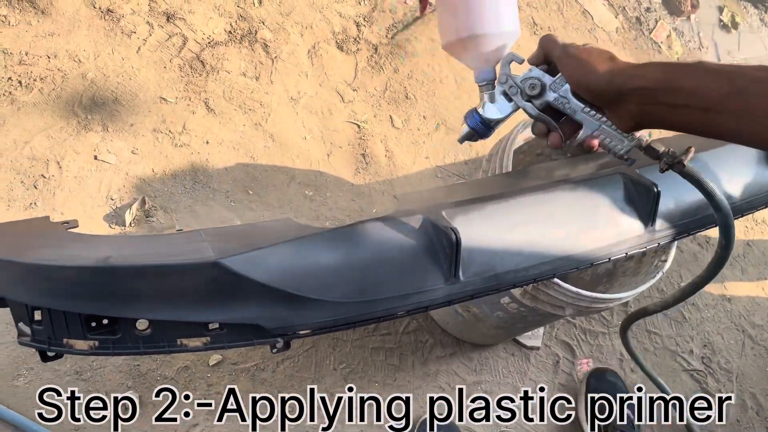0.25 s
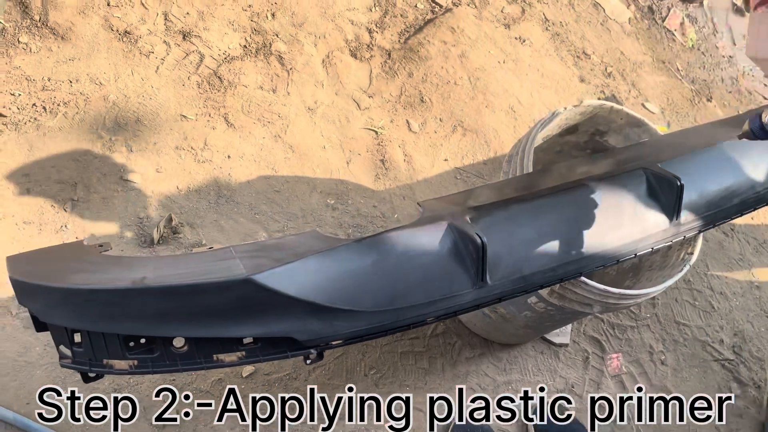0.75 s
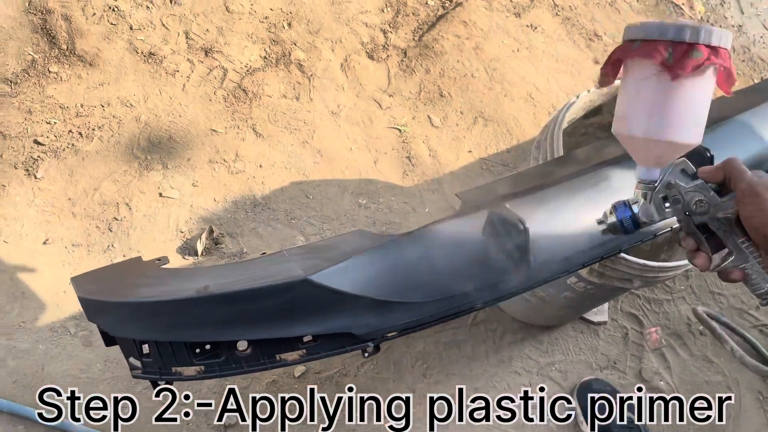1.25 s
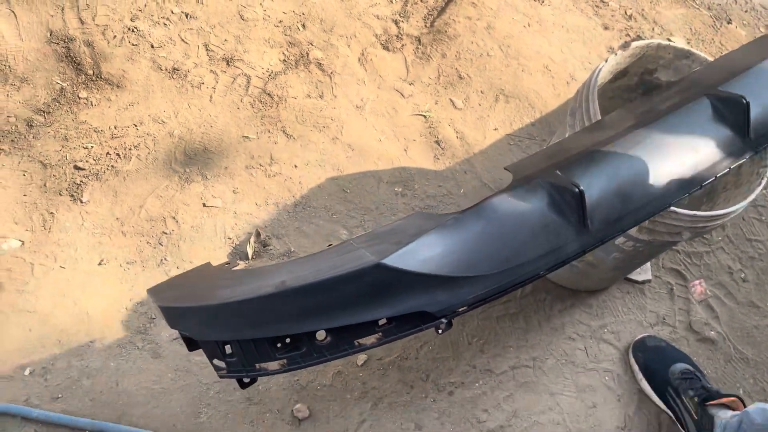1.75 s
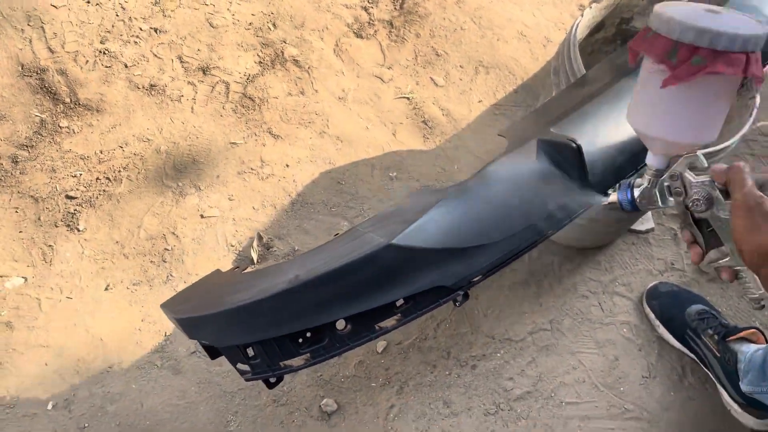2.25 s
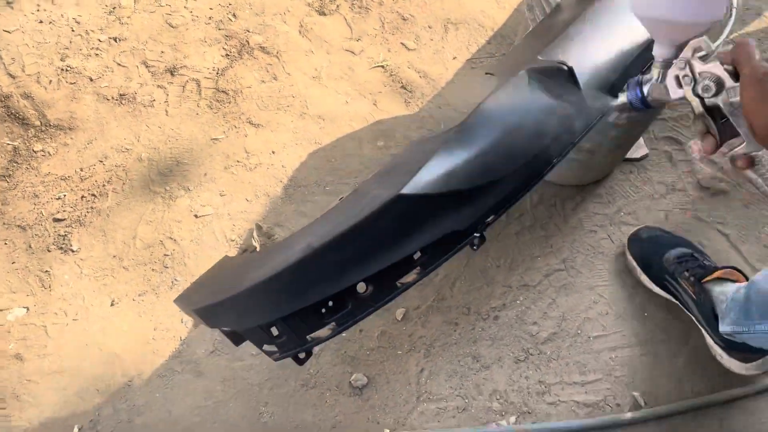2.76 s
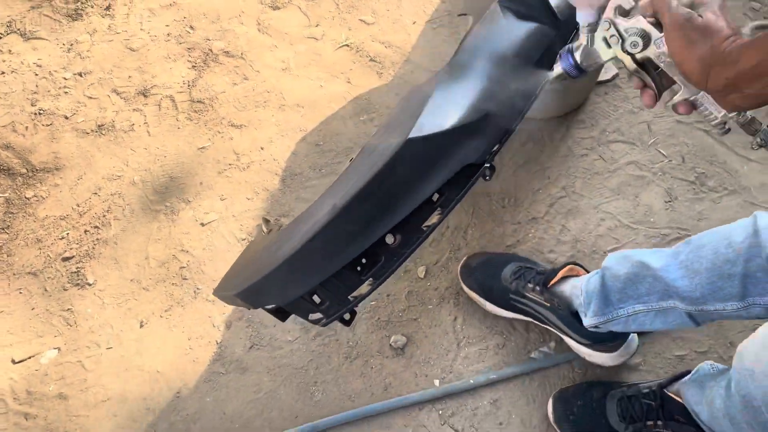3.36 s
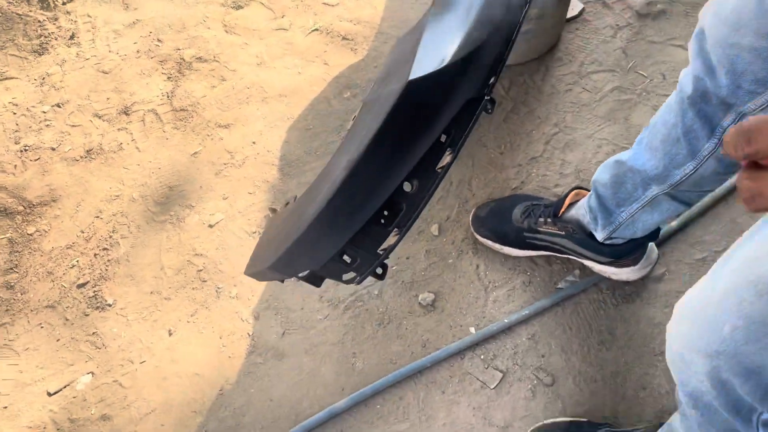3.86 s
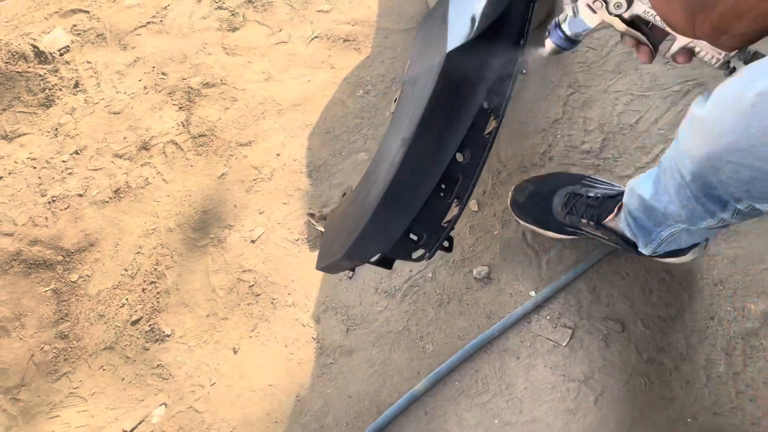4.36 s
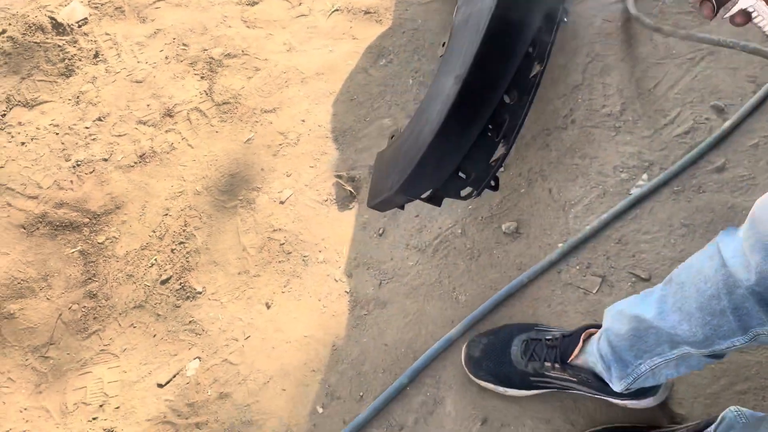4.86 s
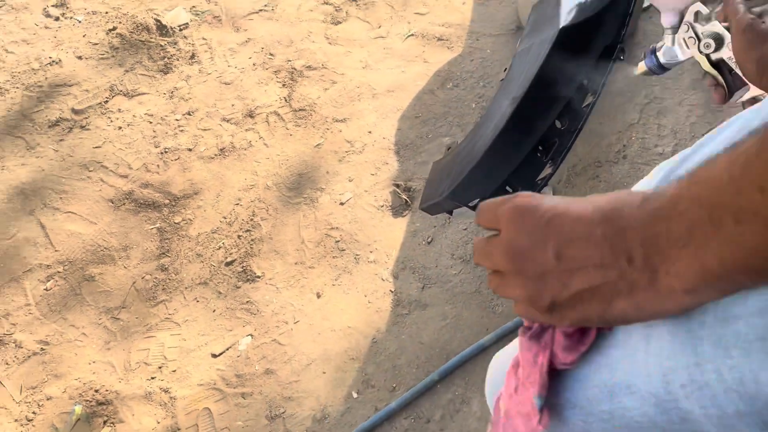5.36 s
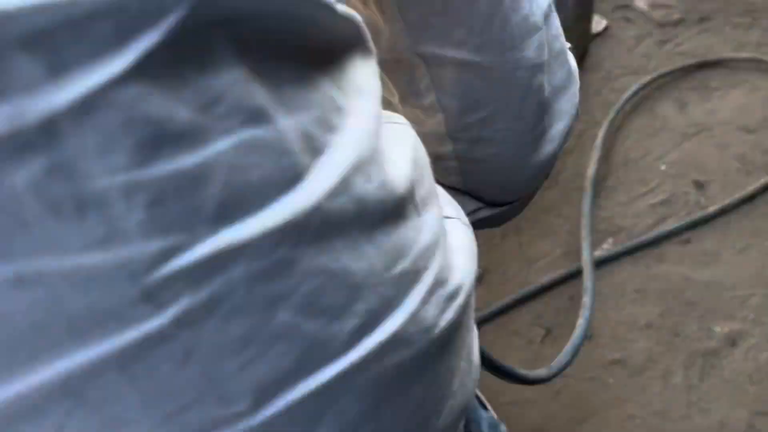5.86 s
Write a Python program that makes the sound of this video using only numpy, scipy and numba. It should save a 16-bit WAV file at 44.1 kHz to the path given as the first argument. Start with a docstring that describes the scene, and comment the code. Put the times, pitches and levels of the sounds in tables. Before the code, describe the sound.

A spray gun close to a handheld stereo microphone in an open sandy yard hisses from the start, a dense bright rush of air leaning a little left, fluttering quickly and changing colour as the gun sweeps. Underneath are low street rumble, a distant idling engine and faint hollow drumming, mostly in the first two seconds. Soft thumps fall at 0.5 and 1.5 s; a faint far sheet-metal clang rattles around 1.45 s. The engine hum swells slightly near 1.9 s. A short knock sounds at 4.06 s, then the engine revs, its pitch climbing until about 5 s before sinking from 5.2 s. A low boom comes at 4.66 s. The hiss weakens after 5.3 s, with a very thin high whistle. At 5.67 s the trigger clicks off; a dull, weak leak fades among tiny clicks until spraying returns about 5.95 s and continues to 6.1 s.

```python
"""Spray gun in a sandy yard

A spray gun sweeps to and fro over a plastic part, near a phone with two microphone ports.
Its air jet is noise in bands that swell and flutter, heard straight and scattered by the yard.
Further off a vehicle engine, a stack of sine waves, idles, is revved once and sinks back.
Noise makes the street rumble, a hollow drumming and a far clang; sines make short thumps and a thin whistle.
The trigger is let go briefly near the end, and a weak leak goes on hissing."""
import sys
import numpy as np
from scipy import signal
from scipy.fft import rfft, irfft, next_fast_len
from scipy.io import wavfile
from scipy.ndimage import uniform_filter1d
from numba import njit

SR = 44100
rng = np.random.default_rng(int(sys.argv[2]) if len(sys.argv) > 2 else 0)


def unload_audio(sound):
    """Save the sound as a 16-bit wav file, at the path given as the first command line argument."""
    columns = np.transpose(np.atleast_2d(sound))
    # keep every value between -1 and 1, then stretch to whole-number steps
    steps = np.round(np.clip(columns, -1, 1) * 32767)
    wavfile.write(sys.argv[1], SR, steps.astype(np.int16))


N = 269451
T = np.arange(N) / SR  # time of every sample in seconds
M = next_fast_len(N)  # length that makes the Fourier transform fast
HZ = np.maximum(np.arange(M // 2 + 1) * SR / M, 1)  # frequency of every spectrum bin


def undb(db):
    """Turn decibels into gain."""
    return 10 ** (np.asarray(db) / 20)


def unit(x):
    """Scale a sound to rms 1."""
    return x / np.sqrt(np.mean(x ** 2))


def curves(table):
    """Read a table's columns at every sample, with straight lines between rows."""
    seconds, *columns = np.transpose(table)
    return [np.interp(T, seconds, column) for column in columns]


def across(table):
    """Read a table's columns at every frequency, with straight lines on a log scale."""
    hz, *columns = np.transpose(table)
    return [np.interp(np.log(HZ), np.log(hz), column) for column in columns]


def noise():
    """Make the spectrum of fresh white noise."""
    return rfft(rng.standard_normal(M))


def walk(rate):
    """Wander at random: levels held for 1 / rate seconds, smoothed twice; spread near 1."""
    hold = int(SR / rate)
    steps = np.repeat(rng.standard_normal(N // hold + 1), hold)
    smooth = uniform_filter1d(uniform_filter1d(steps, hold), hold)
    return 1.4 * smooth[:N]


def resonate(x, hz, width):
    """Ring at one resonance, with gain 1 at its centre."""
    return signal.lfilter(*signal.iirpeak(hz, hz / width, SR), x)


def bump(s, half):
    """Rise and fall smoothly around a moment, reaching 1 at the top."""
    return np.exp(-((T - s) / half) ** 2)


# The jet as the gun sweeps. Each row: time in seconds, level in dB, low roar on the part in dB,
# nozzle peak in dB, treble in dB, left minus right in dB.
# Of the roar, peak and treble only the departure from their median is used.
JET_SWEEP = [(0.0, -27, -11, -8, -10, 1), (0.06, -29.5, -10, -4.5, -7.5, 2),
             (0.2, -27, -12.5, -2.5, -7, 3.4), (0.44, -28.5, -11, -10, -8.5, 5.5),
             (0.6, -30.5, -9.5, -6, -7.5, 4.5), (0.72, -29.5, -14.5, -7.5, -9, 3.4),
             (0.91, -26.5, -15.5, -8.5, -6, 4.5), (0.98, -30, -9, -8, -8.5, 7.6),
             (1.12, -28.5, -8, -7, -8.5, 5), (1.25, -25.5, -14, -11, -12, 6.6),
             (1.45, -29, -11.5, -8.5, -9.5, 4.44), (1.61, -28, -14.5, -6.5, -10.5, 3),
             (1.7, -32, -11.5, -5, -7, 2.2), (1.86, -32, -11, -4.5, -8, 1.9),
             (1.96, -28.5, -13.5, -6.5, -10, 3.1), (2.25, -27.5, -11, -9, -9, 7.5),
             (2.38, -27, -12, -9, -10.5, 4.7), (2.52, -26.5, -13, -7, -9.5, 3),
             (2.68, -27, -11, -8, -8.5, 5.1), (2.85, -29, -10.5, -8, -7, 7),
             (3.06, -31.5, -11, -6.5, -7.5, 4), (3.2, -29.5, -12.5, -9, -8, 8.3),
             (3.42, -27.5, -10, -6.5, -9, 1.48), (3.61, -25, -15.5, -8, -9, 1.11),
             (3.77, -28, -10.5, -8, -7.5, 1.11), (4.03, -29, -17.5, -12.5, -6, 5.65),
             (4.13, -32, -12, -8.5, -5.5, 5.15), (4.52, -27.5, -12, -3.5, -7.5, 1.44),
             (4.89, -29.5, -11, -10.5, -6.5, 4.7), (5.06, -31, -14, -9.5, -8, 3.96),
             (5.26, -32.5, -10.5, -4.5, -6.5, 3.35), (5.38, -33, -13, -12.5, -7, 2.87),
             (5.45, -36.5, -6.5, -4.5, -8, 2.86), (5.53, -37.5, -9, -8.5, -11, 3),
             (5.58, -37, -10, -6, -15, 4), (5.62, -38, -9, -7, -12, 3), (5.67, -39.5, -10, -9, -10, 1),
             (5.93, -40, -9, -8, -10, 1), (6.0, -34, -15, -5.5, -10, 1.5), (6.038, -32, -21, -8, -12, 1.09),
             (6.11, -33.5, -18, -5, -9, 0.97)]
# Colour of the jet. Each row: frequency in Hz, relative strength in dB per Hz.
JET_COLOUR = [(300, -8.5), (600, -10), (860, -6), (1200, -5.5), (1500, -6), (1800, -8.5), (2400, -5),
              (2800, -6.5), (3250, -3.5), (3750, -5.5), (4200, -4), (4700, -3), (5500, -.5), (7000, 0),
              (8500, 0.5), (9500, -4), (10600, -20), (12000, -11.5), (13300, -14), (15400, -13)]
# The two ports. Each row: frequency in Hz, half-turns by which the right leads,
# likeness from 0 to 1, share of the left-right lean.
PORTS = [(300, .08, .75, -.3), (700, .05, .75, 0), (1200, .1, .85, .7), (1900, .12, .75, .6),
         (3100, -.09, .7, 1.2), (4000, 0, .85, .7), (4700, -.25, .5, 1.3), (5300, 0, .25, 1.4),
         (6000, .13, .78, .5), (7000, .5, .75, .4), (7450, .75, .8, .2), (7700, 1, 1, 0), (8600, 1, 1, 0),
         (9100, 1.2, .85, 0), (9800, 1.5, .55, 0), (10350, 2, 1, 0), (12350, 2, 1, 0), (13100, 2.45, .5, 0),
         (13850, 3, 1, 0), (16000, 3, 1, 0)]
# Centres in Hz of low roar, middle, nozzle peak, main hiss and treble.
AIM_HZ = [1300, 2880, 4300, 6370, 8100]
# The jet's colour shifts. Each row: time in seconds, share of the second colour from 0 to 1.
COLOUR_SHIFT = [(0, 0), (1.6, 0), (2.1, 0.27), (3.0, .6), (3.9, 0.5), (4.3, 1), (5.5, 0.84), (5.7, .5),
                (6.11, .5)]
# The second colour against the first. Each row: frequency in Hz, change in dB.
SECOND_COLOUR = [(250, 3.5), (400, -0.5), (560, 0), (700, -4.5), (850, -4.5), (1000, -2), (1200, 0),
                 (2600, 0.5), (3250, -1), (3750, 0.5), (4300, -2), (4750, -1.5), (5500, -0.5), (7300, -1.5),
                 (9000, -1)]
LET_GO_S, PULL_S = 5.688, 5.928  # trigger let go and pulled again
CLOSE_S, OPEN_S = 0.035, 0.045  # times the valve takes
LEAK_DB, LEAK_DB_PER_OCTAVE = -9, -1.5  # what still hisses then, at 1 kHz, and its tilt
FADE_DB_PER_S, TREBLE_FADE_DB_PER_S = -8, -75  # the leak fades; the treble has this extra fade
SCATTER_DB, SCATTER_SLOPE = -1.5, -.6  # scattered share at the median level, its change per dB of level
FLICKER_DB = 1.66  # extra flutter of the treble


def jet():
    """Turbulent air in third-octave bands: the gun's aim tilts them and eddies make them flutter."""
    level_db, low_db, peak_db, treble_db, pan_db = curves(JET_SWEEP)
    # a gun turned away is quieter and sounds more diffuse
    scatter_db = SCATTER_DB + SCATTER_SLOPE * (level_db - np.median(level_db)).clip(-6, 6)
    lead, like, lean = across(PORTS)
    colour = undb(across(JET_COLOUR)[0])

    # the same sound reaches both ports with a lag; what the yard scatters is unrelated
    air = rfft(echoed(rng.standard_normal(N)), M)
    direct = rfft(unit(irfft(air * colour, M))) * np.sqrt(like)
    ports = [direct, direct * np.exp(1j * np.pi * lead)]
    scattered = [rfft(unit(irfft(noise() * colour, M))) * np.sqrt(1 - like) for _ in ports]

    aim_db = np.array([v - np.median(v) for v in (low_db, 0 * T, peak_db, 0 * T, treble_db)])
    closing = np.clip((T - LET_GO_S) / CLOSE_S, 0, 1)
    shut = closing * np.clip(1 - (T - PULL_S) / OPEN_S, 0, 1)
    out = np.zeros((2, N))
    shared_eddy = walk(6.5)
    for step in range(25, 43):  # the band centre is 2 ** (step / 3) Hz
        band = np.cos(np.pi / 2 * np.clip(3 * np.log2(HZ) - step, -1, 1)) ** 2
        # how far this band belongs to each of the five aim centres
        place = np.interp(step / 3, np.log2(AIM_HZ), range(5))
        share = np.maximum(1 - abs(place - np.arange(5)), 0)
        octave = step / 3 - np.log2(1000)
        fade_db_per_s = FADE_DB_PER_S + TREBLE_FADE_DB_PER_S * share[-1]
        leak_db = LEAK_DB + LEAK_DB_PER_OCTAVE * octave + (T - LET_GO_S) * fade_db_per_s
        flutter_db = 0.13 * shared_eddy + 0.043 * walk(3.85) + 0.25 * walk(8) + 1.3 * walk(21.013)
        flutter_db += share[-1] * FLICKER_DB * walk(13)
        db = level_db + share @ aim_db + shut * leak_db + flutter_db
        # the smallest lean inside the band sets its left-right tilt
        band_lean = lean[band > .2]
        tilt_db = pan_db * band_lean[np.argmin(abs(band_lean))] / 2
        for c, sign in enumerate((1, -1)):
            straight = irfft(ports[c] * band, M)[:N]
            spread = irfft(scattered[c] * band, M)[:N]
            out[c] += undb(db + sign * tilt_db) * (straight + undb(scatter_db) * spread)

    second = irfft(rfft(out, M) * undb(across(SECOND_COLOUR)[0]), M)[:, :N]
    return out + curves(COLOUR_SHIFT)[0].clip(0, 1) * (second - out)


# Echoes of the jet, ground first, then part, legs and walls.
# Each row: delay in ms, level in dB, drift in ms.
JET_ECHOES = [(.82, -23.5, 0.05), (2.1, -26, 0.15), (3.3, -13.5, 0.217), (5.2, -29, 0.235),
              (7.3, -22, 0.162), (11.5, -20, 0.305)]


def echoed(x):
    """Near surfaces return the sound late; the delays drift as the gun moves, so the combs slide."""
    now = np.arange(N)
    out = x
    for ms, db, drift in JET_ECHOES:
        delay = (ms + drift * walk(1.2)) * SR / 1000
        out = out + undb(db) * np.interp(now - delay, now, x)
    return out


# The nozzle peak slides with the gun's angle. Each row: time in seconds, centre in Hz, lift in dB.
NOZZLE_SLIDE = [(0, 4000, 3), (.2, 4300, 2), (.6, 4020, 2), (.85, 4350, 6), (1.1, 4100, 2), (1.28, 3900, 3),
                (1.4, 4260, 4), (1.55, 3990, 2.5), (1.8, 4290, 4), (2.04, 4160, 3), (2.16, 3750, 4),
                (2.5, 4350, 6), (2.65, 4250, 4), (2.89, 3750, 3), (3.05, 4300, 3), (3.22, 3850, 4),
                (3.42, 3900, 6), (3.6, 4100, 5), (3.84, 4210, 3), (3.95, 3800, 3), (4.5, 4050, 5),
                (5.07, 4180, 3.5), (5.25, 4150, 5), (5.6, 3920, 3), (5.7, 4100, 1.5), (5.92, 4100, 1.5),
                (5.98, 3850, 4), (6.11, 4100, 3)]
NOZZLE_WIDTH_HZ = 470


def nozzle(x):
    """The nozzle favours one narrow range: lift this sliding peak out of the hiss."""
    hz, lift_db = curves(NOZZLE_SLIDE)
    g, k = np.tan(np.pi * hz / SR), NOZZLE_WIDTH_HZ / hz
    return np.array([port + (undb(lift_db) - 1) * sliding(port, g, k) for port in x])


@njit
def sliding(x, g, k):
    """Band-pass whose centre moves every sample, with gain 1 there; g sets the centre, k the width."""
    y, b, l = np.empty(len(x)), 0., 0.  # output, band memory, low memory
    for i in range(len(x)):
        v = (b + g[i] * (x[i] - l)) / (1 + g[i] * (g[i] + k[i]))
        b, l, y[i] = 2 * v - b, l + 2 * g[i] * v, k[i] * v
    return y


# The engine. Each row: time in seconds, firing rate in Hz, level in dB,
# then the lift of the second, fourth, fifth and sixth order in dB.
ENGINE_RUN = [(0, 24.7, -57, 4, -4, 0, 0), (.1, 25.07, -41, -5, -3, 0, 1), (.3, 23.94, -56, 18, 2, -8, 15),
              (.75, 24.46, -51, -1, 4, 8, -2), (1.08, 25.65, -48.5, 11, 10, 11.5, 5),
              (1.45, 24.05, -53.5, -1, 0, 8.5, 8), (1.7, 24.9, -55, -5, 11, 15, -2),
              (1.9, 25.84, -41, 7, 9.5, 0, 4), (2.1, 25.65, -44, -12, 10, 4, -7),
              (2.3, 25.27, -46, 1, 10, -7, -4), (2.55, 24.86, -49.5, -3, 0, 14, 4),
              (3.0, 25.03, -49.5, -7, 10, 16, 7), (3.3, 24.6, -52.5, 6, 3, 19, 11),
              (3.6, 24.94, -50, 1, 8.5, 11.5, 9), (3.92, 26.27, -46, 10, 6, 4.5, -8),
              (4.05, 28.18, -43.5, -16, -1, 1, -4), (4.12, 30.46, -35.5, 5, -1, -2, 2.5),
              (4.2, 35.44, -39.5, 7, 7, 0.5, 10), (4.3, 40.47, -35.5, -1, 1.5, -1.5, -3),
              (4.4, 46.78, -31, 3.5, 0, -6, 8), (4.54, 53.32, -33, 1, 1.5, -4, -1),
              (4.69, 58.7, -34, 0, -6, -11, 5), (4.85, 60.1, -32.5, -1.5, -1, -11, 3),
              (5.07, 60.4, -29.5, -2.5, 5, -3, -4), (5.2, 59.2, -34, 1, -1, -10, 9),
              (5.235, 57.5, -45, 6, 0, 10, 13), (5.27, 54.5, -41.5, 2, 5, 10.5, 15),
              (5.33, 51, -40.5, 14, 8, 13, 7), (5.4, 46, -39.5, -5, 5, -3, 6),
              (5.52, 40.67, -38.5, 2.5, -9, 5.5, -2), (5.65, 36.23, -41, -1, -2, -4, 4.5),
              (5.76, 33.52, -40.5, 3, 1, -4, 11), (5.86, 32.13, -46.5, 11, 9, 0, 2),
              (5.97, 34, -42, 2, -1, 2, 13.5), (6.11, 35.27, -42, -3, 10, -6, 7)]
# More lifts. Each row: time in seconds, lift of the seventh, eighth and ninth order in dB.
UPPER_LIFT = [(0, -1, 1, 2), (1.9, -1, -1, 6), (2.15, 2.5, 1, 11), (2.4, 0, 2, 19), (2.85, 5, 4.5, 17),
              (3.3, -7, 3, 21.5), (3.55, 2, 3, 14), (3.8, 5.5, 8, 0), (4.1, 0, 2, -4), (4.4, -8, -8, 3),
              (4.7, 7, 5.5, -4), (4.9, -2, -1, -3), (5.06, 3, -12, -3), (5.3, 8, 3, 2), (5.55, -8, 5, 7),
              (6.11, -5, -12, -2)]
# Strength in dB of each order, that is each multiple of the firing rate, from the first up.
ORDER_DB = [1.5, 2.5, 3, -1.5, -2.5, -6.5, -9.5, -6.5, -15, -11, -16]
# Colour of the exhaust. Each row: frequency in Hz, gain in dB.
EXHAUST_COLOUR = [(25, -20), (38, -11), (50, -14), (76, -4), (84, 3), (94, -2.5), (106, -5.5), (135, -6),
                  (155, -6), (181, -0.5), (212, -5), (241, -14.5), (270, -14.5), (360, -20.5), (440, -13.5),
                  (520, -24.5), (700, -10)]
WALL_MS, WALL_SHARE = 48.5, .35  # delay and strength of an inverted echo
WAVER_DB = 1.0  # each order wavers on its own


def engine():
    """Sines at multiples of the firing rate; each is delayed and wavers on its own on the long way over."""
    hz, level_db, second_db, fourth_db, fifth_db, sixth_db = curves(ENGINE_RUN)
    phase = 2 * np.pi * np.cumsum(hz + .15 * walk(12)) / SR
    edge_hz, pass_db = np.transpose(EXHAUST_COLOUR)
    lift_db = {2: second_db, 4: fourth_db, 5: fifth_db, 6: sixth_db}
    lift_db.update(zip((7, 8, 9), curves(UPPER_LIFT)))
    out = 0
    for k, order_db in enumerate(ORDER_DB, 1):
        exhaust_db = np.interp(k * hz, edge_hz, pass_db)
        db = level_db + order_db + exhaust_db + lift_db.get(k, 0) + WAVER_DB * walk(9)
        # the echo thins evenly spaced pitches; the orders slide through them
        comb = abs(1 - WALL_SHARE * np.exp(2j * np.pi * k * hz * WALL_MS / 1000))
        tone = np.sin(k * phase + .4 * k * k + .3 * walk(8))
        out = out + np.sqrt(2) * comb * undb(db) * tone
    # the upper orders lie more to the right
    upper = resonate(out, 304.0, 280.0)
    return out + 0.42 * upper * np.array([[-1], [1]])


# Thumps and clicks. Each row: start in seconds, level in dB, pitch in Hz, seconds to die away by 60 dB.
THUMPS = [(.512, -30, 228.3, 0.17), (1.512, -30, 95, 0.11), (4.064, -20, 587, 0.017),
          (4.067, -29, 1000, 0.019), (4.658, -24, 97, 0.34), (5.645, -31, 55, .2), (5.69, -29, 85, .3),
          (5.785, -33, 88, .2), (5.84, -30, 55, .2), (5.686, -34, 450, .03), (5.669, -22.5, 700.7, 0.0067),
          (5.669, -31, 1200, 0.0065), (5.707, -25.5, 470, 0.018), (5.738, -38, 502, 0.031),
          (5.772, -43, 994, .008), (5.81, -40, 651, .015), (5.835, -40, 800, .02), (5.85, -38, 620, 0.013),
          (5.869, -37.5, 1014, 0.016), (5.942, -42, 776, 0.023)]


def thumps():
    """Short thumps, clicks and one longer low boom: sines that set in fast and die away."""
    out = 0
    for s, db, hz, ring in THUMPS:
        t = np.maximum(T - s, 0)
        onset = 1 - np.exp(-t * hz * 1.5)
        out = out + undb(db) * np.sin(2 * np.pi * hz * t) * 1000. ** (-t / ring) * onset
    return out


# Whistling. Each row: start in seconds, length in seconds, pitch in Hz, level at the start in dB.
WHISTLES = [(5.31, .17, 4375, -53), (5.49, .325, 4376, -50.5), (5.826, .13, 4378, -62),
            (5.845, .09, 4540, -62.5)]
WHISTLE_WAVER_HZ, WHISTLE_EDGE_S, WHISTLE_FADE_DB_PER_S = 3, .006, -36


def whistle():
    """Thin wavering sines around the shut-off; each sets in, fades and breaks off."""
    out = 0
    for s, length, hz, db in WHISTLES:
        fading_db = db + WHISTLE_FADE_DB_PER_S * (T - s).clip(0, length) + 1.5 * walk(30)
        tone = np.sin(2 * np.pi * np.cumsum(hz + WHISTLE_WAVER_HZ * walk(40)) / SR)
        edges = np.clip(np.minimum(T - s, s + length - T) / WHISTLE_EDGE_S, 0, 1)
        out = out + np.sqrt(2) * undb(fading_db) * tone * edges
    return out


# Modes of the clang. Each row: pitch in Hz, relative level in dB,
# seconds to die away by 60 dB once the rattle is over.
CLANG_MODES = [(130, 2, 0.45), (238, -1, 0.96), (295, -3, 0.58), (361, 5, 0.4), (453, 2, .35),
               (557, 4, 0.52), (657, 3.5, 0.22), (826, 0.5, 0.55), (1014, 0.5, .4), (1420, -6, .2)]
CLANG_S, CLANG_RATTLE_S, CLANG_DB = 1.446, .15, -44.5  # start, time it keeps rattling, level


def clang():
    """Sheet metal struck far off rattles a moment; echoes roughen each mode and the low ones build up late."""
    t = np.maximum(T - CLANG_S, 0)
    swell = 1 - np.exp(-t / 0.017)
    out = 0
    for hz, db, ring in CLANG_MODES:
        # narrow noise stands for the roughened mode
        rough = resonate(resonate(rng.standard_normal((2, N)), hz, 44.0), hz, 90.0)
        decay = 1000. ** (-(t - CLANG_RATTLE_S).clip(0) / ring)
        build_up = 1 - np.exp(-t * hz / 11.0)
        out = out + undb(db) * decay * unit(rough) * build_up
    return undb(CLANG_DB) * swell * out


# Street level. Each row: time in seconds, level in dB.
STREET_LEVEL = [(0, -40), (.15, -40), (.5, -47), (.7, -48), (1.08, -44.5), (1.35, -44), (1.8, -41.5),
                (2.05, -47), (2.5, -46), (2.9, -49), (3.9, -49), (4.1, -43), (4.4, -45), (4.75, -41),
                (5.05, -47), (5.3, -46), (5.65, -43), (5.75, -47), (6.11, -48)]
# Colour of the rumble. Each row: frequency in Hz, relative strength in dB per Hz.
RUMBLE_COLOUR = [(25, -20), (45, -0.5), (75, 4.5), (130, -0.5), (250, -4.5), (500, -14.5), (1000, -21.5),
                 (3000, -25.5), (9000, -55)]


def street():
    """Far traffic as coloured noise: the bass is alike at both ports, the rest less so."""
    colour = undb(across(RUMBLE_COLOUR)[0])
    side = noise() * np.clip(HZ / 720.0, .15, .9)
    mid = noise()
    both = np.array([irfft((mid + sign * side) * colour, M)[:N] for sign in (1, -1)])
    return unit(both) * undb(curves(STREET_LEVEL)[0] + 3.3 * walk(8.6))


# Swells of the drumming. Each row: time of the top in seconds, level in dB.
DRUM_SWELLS = [(0.742, -49), (.85, -52), (1.02, -48.5), (1.52, -46), (1.63, -48), (1.75, -48),
               (1.96, -45.5), (2.76, -53.5), (3.45, -46.5), (4.18, -61)]
DRUM_HZ, DRUM_WIDTH_HZ = 233.4, 33
DRUM_DB, DRUM_SWELL_S = -64, 0.058  # resting level and half-length of a swell


def drumming():
    """A hollow low resonance, noise ringing twice at one pitch, that comes and goes."""
    ring = rng.standard_normal(N)
    for _ in range(2):
        ring = resonate(ring, DRUM_HZ, DRUM_WIDTH_HZ)
    swells = sum(undb(db) * bump(s, DRUM_SWELL_S) for s, db in DRUM_SWELLS)
    return unit(ring) * (undb(DRUM_DB) + swells)


DIP_S, DIP_DB, DIP_HALF_S = 5.915, -5, 0.035  # the low sounds dip briefly


def scene():
    """Add up everything that reaches the two ports."""
    low = engine() + street() + drumming()
    low = low * undb(DIP_DB * bump(DIP_S, DIP_HALF_S))
    return nozzle(jet()) + low + thumps() + clang() + whistle()


TOP_HZ = 15700


def record(dry):
    """The phone loses the deepest bass and cuts the top steeply."""
    thin = signal.sosfilt(signal.butter(2, 38., "high", fs=SR, output="sos"), dry)
    return signal.sosfilt(signal.ellip(14, .3, 80, TOP_HZ, fs=SR, output="sos"), thin)


dry = scene()
out = record(dry)
unload_audio(out)
```